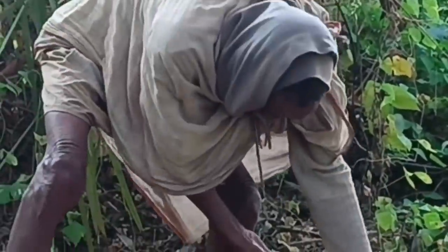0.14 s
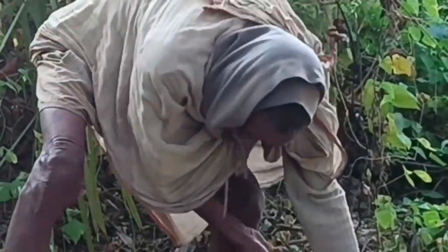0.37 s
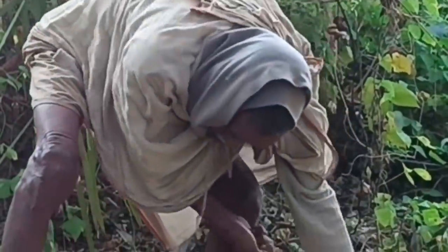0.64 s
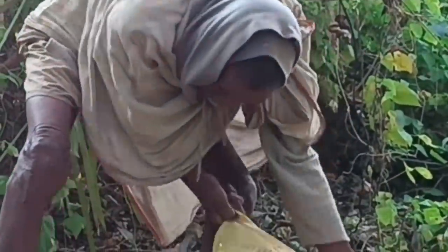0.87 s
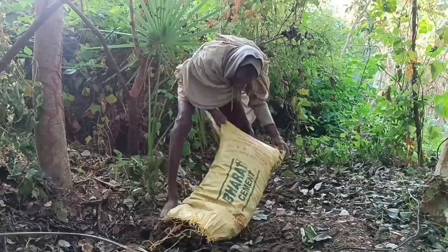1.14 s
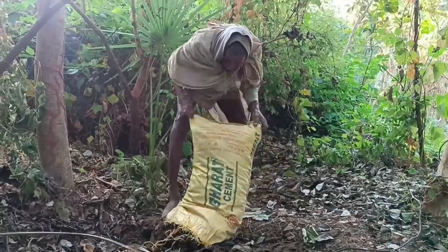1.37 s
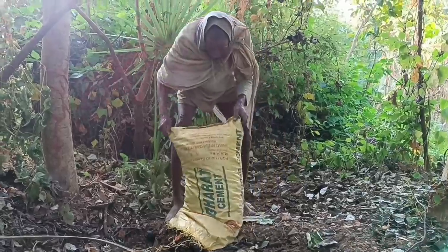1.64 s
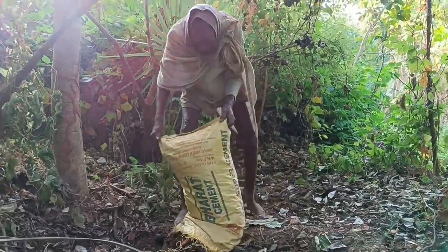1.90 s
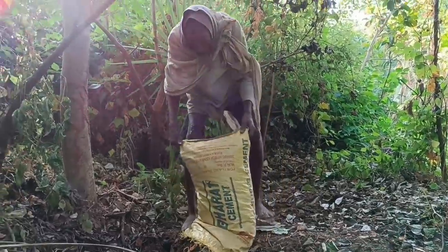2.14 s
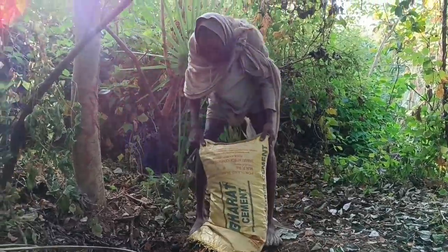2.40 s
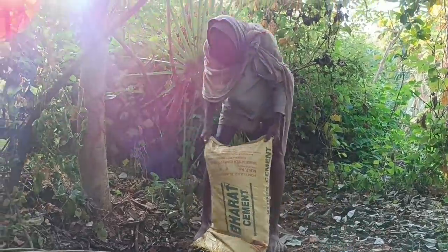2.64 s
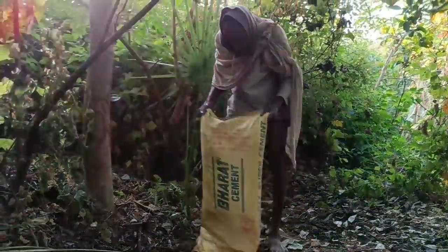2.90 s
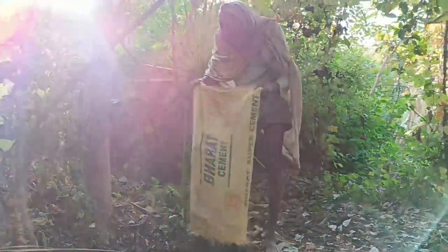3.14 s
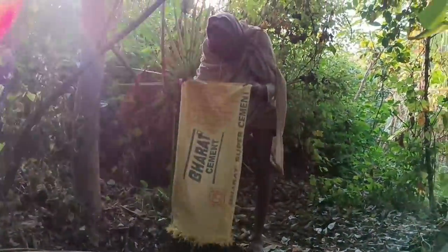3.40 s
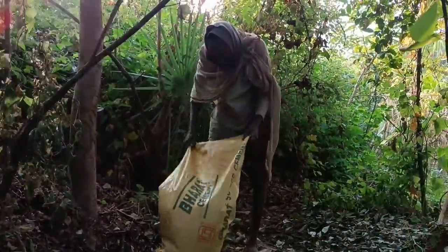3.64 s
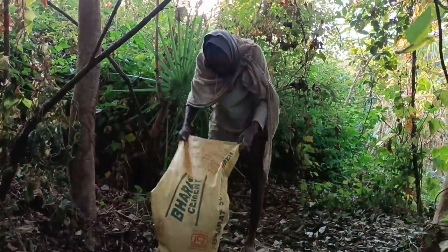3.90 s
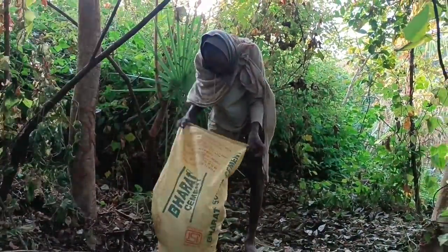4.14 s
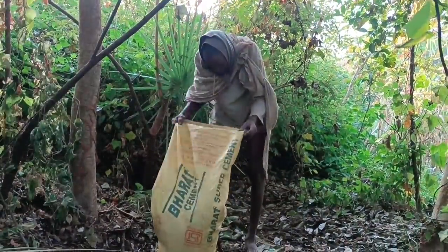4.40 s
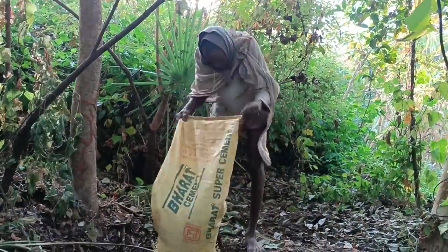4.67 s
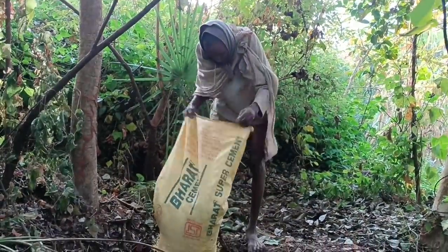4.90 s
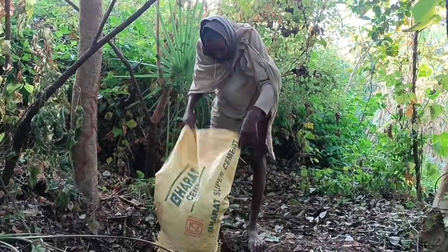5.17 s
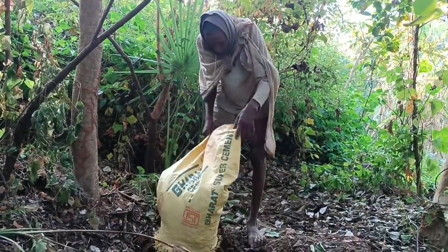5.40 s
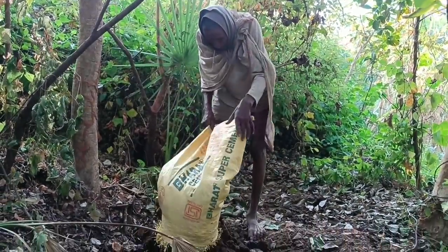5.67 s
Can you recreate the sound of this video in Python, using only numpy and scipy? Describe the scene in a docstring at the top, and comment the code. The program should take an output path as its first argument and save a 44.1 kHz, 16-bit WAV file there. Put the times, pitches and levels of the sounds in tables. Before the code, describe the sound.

A soft, low hush of distant leaves runs throughout. In the first second a thin, unsteady bird whistle holds high, then slides downward, while dry twigs snap close by at about 0.1 and 0.25 s. From 1 to 2 s there is light leaf stirring, small brittle ticks and a muffled cloth bump, with a faint dove-like coo; a rough leafy burst and hoarse little chirps come at 1.8 to 2.05 s. A scratchy, fizzy rustle swells near 2.4 s. From 2.8 to 3.6 s the stiff woven sack is hauled and shaken in a dense, hollow crackling rush, which stops abruptly. After softer shuffles around 3.8 to 4.2 s, forceful tugs follow at about 4.4, 4.7, 5.0, 5.3 and 5.4 s, each a crisp crunch with a short low thump and woody snaps, easing after 5.6 s. Outdoor phone pickup, close and dry.

```python
"""A soft hush of far leaves comes first, with a thin far bird whistle and dry twig snaps close by.
A stiff woven sack is then shaken and dragged over dry leaves in the bush, a few steps from a phone.
Random creases excite the crackle and hollow rings of the weave; damped low tones make the cloth thumps.
Gliding tones make small birds, a dove and one rough burst of leaf rustle. One bounce off the ground
answers body, thumps and snaps; decaying noise makes the scatter of the foliage."""
import sys
import numpy as np
from scipy import signal
from scipy.fft import rfft, irfft, next_fast_len
from scipy.io import wavfile
from scipy.ndimage import uniform_filter1d, map_coordinates

SR = 44100
rng = np.random.default_rng(int(sys.argv[2]) if len(sys.argv) > 2 else 0)


def to_wav(s):
    """Save 16-bit WAV."""
    ch = np.atleast_2d(s).T  # columns
    pcm = np.round(np.clip(ch, -1, 1) * 32767)  # PCM
    wavfile.write(sys.argv[1], SR, pcm.astype(np.int16))


def boost_factor(decibels):
    """Convert a level in decibels to a linear amplitude factor."""
    exponent = np.asarray(decibels, float) / 20
    return 10 ** exponent


N = 255056  # length in samples

# coherence of left and right for near sounds: f/Hz, likeness [-1 to 1]
NEAR_LIKENESS = [(60, 0.94), (270, 0.99), (740, 0.85), (2000, 0.58), (5500, 0.41), (9000, 0.04),
                 (15000, 0.15)]
# the same for the far bush and the far tones: f/Hz, likeness [-1 to 1]
FAR_LIKENESS = [(60, 0.33), (1200, 0.18), (9000, 0.21)]
# feet and hands stir the leaf litter throughout: t/s, level/dB, fine fizz/dB re level
RUSTLE = [(0, -81, 4), (.3, -90, 5), (.42, -78.5, 4.5), (.6, -73.5, 3.5), (.9, -70, 2), (1.15, -65, 4.5),
          (1.5, -64.5, 6), (1.7, -67.5, 10), (1.8, -63.5, 8), (2.0, -60.5, 7), (2.22, -72, 12),
          (2.65, -59.5, 1.5), (3.7, -60, 3), (4.3, -62, 7), (4.63, -65, 12), (4.93, -64.5, 13),
          (5.2, -60.5, 6), (5.5, -56.5, 8), (5.78, -66, 5)]


def unit(x):
    """Normalisation: the signal scaled to rms 1."""
    return x / np.sqrt(np.mean(x ** 2) + 1e-20)


def along(points, hz):
    """Interpolation of (f/Hz, value) points on a logarithmic frequency axis."""
    f, v = np.transpose(points)
    return np.interp(np.log(hz + 1), np.log(f + 1), v)


def curves(rows):
    """Linear interpolation in time: one value per sample for each column after t/s."""
    s, *cols = np.transpose(rows)
    return [np.interp(np.arange(N) / SR, s, c) for c in cols]


def wobble(rate):
    """Slow random modulation: a spline through normal random knots, rate knots a second."""
    return map_coordinates(rng.standard_normal(N // 100), [np.arange(N) * rate / SR])


def filtered(x, response):
    """Linear filtering: the spectrum times a complex response of frequency."""
    m = next_fast_len(N + SR // 2)
    return irfft(rfft(x, m) * response(np.fft.rfftfreq(m, 1 / SR)), m)[..., :N]


def coloured(x, spectrum):
    """Spectral shaping by a (f/Hz, level/dB) table, then rms 1."""
    return unit(filtered(x, lambda hz: boost_factor(along(spectrum, hz))))


def spread(a, b, alike):
    """Partial coherence: two channels share a and differ by b, by an angle set at each frequency."""
    turn = lambda hz: np.arccos(np.clip(along(alike, hz), -1, 1)) / 2
    mid, side = filtered(np.array([a, b]), lambda hz: np.array([np.cos(turn(hz)), np.sin(turn(hz))]))
    return np.array([mid + side, mid - side])


def panned(x, pan_db):
    """Interchannel level difference, half on each side."""
    return np.array([x * boost_factor(pan_db / 2), x * boost_factor(-pan_db / 2)])


def bush():
    """Broadband noise of far leaves and low air, slowly modulated in level as if breathing."""
    # far leaves and air: f/Hz, relative level/dB
    hush_spectrum = [(30, -22), (90, 3), (140, 0), (300, -9), (700, -19), (1500, -24.5), (4500, -25.5),
                     (16000, -36.5)]
    a, b = (coloured(rng.standard_normal(N), hush_spectrum) * boost_factor(3.2 * wobble(4.9)) for _ in range(2))
    return boost_factor(-63.0) * spread(a, b, FAR_LIKENESS)


def handling():
    """Incoherent sources add in power: haul, tugs and leaves give the level/dB of any layer."""
    # the full sack is hauled up and shaken: t/s, crackle level/dB,
    # weight/dB (how much of the filled body moves), hollow ring/dB
    haul_rows = [(2.701, -63, -2, -8), (2.78, -49, -17, 4), (2.86, -46, -6, 3), (2.999, -37.5, 9, -1.5),
                 (3.096, -37, 8, 3.5), (3.176, -31.5, 7.5, -2), (3.269, -40, 8.5, 2.5),
                 (3.301, -32.5, 8.5, 1), (3.396, -31, 3, -1), (3.582, -33.5, 10.5, 1), (3.627, -55.5, 1, 0),
                 (3.7, -82, -4, -10)]
    # short tugs at the cloth: peak t/s, crackle level/dB, rise/s, fall/s (each spans 20 dB),
    # weight/dB, hollow ring/dB
    tug_rows = [(.126, -55, 0.02, 0.03, -4, -7), (0.149, -55, .015, 0.027, -32, -9),
                (.533, -70, 0.022, 0.085, 5, 6), (1.01, -66.5, 0.16, .1, 14.5, 5.5),
                (1.337, -57.5, 0.017, 0.24, -5, 6), (1.41, -61, 0.046, 0.092, -2, 0),
                (1.516, -57.5, 0.016, 0.082, -8, -7), (1.57, -64.5, 0.09, 0.06, 13.5, 2),
                (1.657, -62, 0.023, 0.028, -27, -11), (2.407, -38, 0.083, 0.18, -23.5, -7),
                (2.5, -47.5, 0.23, 0.031, -20, -12), (2.569, -51.5, 0.056, 0.068, -45, -15),
                (3.685, -55.5, 0.14, 0.062, 11, 6), (3.78, -53, 0.046, .2, 9, 0),
                (3.839, -46, 0.12, 0.037, 11, -2), (3.993, -55.5, 0.14, 0.11, 4.5, 1),
                (4.162, -46.5, 0.081, 0.07, 4, -1), (4.428, -44.5, 0.028, 0.18, 11.5, 4.5),
                (4.5, -45.5, 0.19, 0.16, -9, -5), (4.576, -43, 0.081, 0.0283, 13.5, 2.5),
                (4.722, -34.5, 0.044, 0.11, 12, 3), (4.79, -46, .12, 0.2, -3, -2),
                (4.86, -47, 0.25, 0.064, 2, 0), (5.02, -42.5, 0.076, 0.11, 9.5, -3),
                (5.092, -40, 0.05, 0.027, 2, -8.5), (5.274, -38.5, 0.052, 0.11, 11.5, -7),
                (5.34, -45.5, 0.25, .2, -10, 2), (5.405, -34, 0.089, 0.036, 1, 3.5),
                (5.555, -44, 0.038, 0.066, 9, 3), (5.66, -53.5, 0.039, 0.084, -9, -3.5)]
    roundness = 0.042  # rounds the top of a tug
    t = np.arange(N) / SR
    silent_start = (haul_rows[0][0] - .1, -120, 0, 0)
    haul_db, haul_weight, haul_ring = curves([silent_start, *haul_rows])
    peak, db, rise, fall, weight, ring = np.transpose(tug_rows)
    u = (t - peak[:, None]) / np.where(t < peak[:, None], rise[:, None], fall[:, None])
    tug_power = boost_factor(-40 * (np.sqrt(u * u + roundness ** 2) - roundness))
    leaves_db, leaf_fizz_db = curves(RUSTLE)

    def level(cloth_db, per_weight, per_ring, leaf_db):
        """Power sum of one layer, from its gains on cloth, weight, ring and leaves."""
        tugs = boost_factor(2 * (db + per_weight * weight + per_ring * ring)) @ tug_power
        haul = boost_factor(2 * (haul_db + per_weight * haul_weight + per_ring * haul_ring))
        cloth = boost_factor(2 * cloth_db) * (tugs + haul)
        leaves = boost_factor(2 * (leaves_db + leaf_db))
        return 10 * np.log10(cloth + leaves)

    return level, leaf_fizz_db


def creases(per_s, scatter_db, rub):
    """Shot noise of tiny buckling clicks, most small and a few large, in clumps over a smooth rub."""
    chance = np.clip(per_s * boost_factor(3 * wobble(30)) / SR, 0, 1)
    size = boost_factor(scatter_db * np.minimum(rng.exponential(size=N), 3)) * rng.standard_normal(N)
    # denser clicks are made smaller, so that density alone hardly changes the power
    clicks = (rng.random(N) < chance) * unit(size) / np.sqrt(per_s / SR)
    return clicks + rub * rng.standard_normal(N)


def patchy(x, patchy_db):
    """Time-varying colour: folds come and go, so small patches of time and frequency shift in level."""
    z = signal.stft(x, SR, nperseg=512)[2]
    field = uniform_filter1d(rng.standard_normal(z.shape), size=3, axis=0)
    field = uniform_filter1d(field, size=6, axis=1)
    return unit(signal.istft(z * boost_factor(patchy_db * unit(field)), SR, nperseg=512)[1][:N])


def crumples(count):
    """Damped resonance: folds of stiff weave pop at random, each ringing at its own pitch; rms 1."""
    middle_hz, octaves, cycles = 1300, 0.79, 15  # pitch and its spread; cycles in a 60 dB decay
    when, size = rng.random((count, 2)).T
    hz = middle_hz * 2 ** (octaves * rng.standard_normal((count, 1)))
    t = np.arange(SR // 25) / SR
    decay = boost_factor(11.6 * size[:, None] - 60 * t * hz / cycles)
    onset = 1 - np.exp(-t * hz)
    rings = decay * onset * np.sin(2 * np.pi * hz * t)
    at = (when * N).astype(int)[:, None] + np.arange(len(t))
    return unit(np.bincount(at.ravel(), rings.ravel())[:N])


def sack():
    """Common excitation: one crease stream drives crackle, fizz and hollow rings; slack cloth booms."""
    # crackle of the weave: f/Hz, relative level/dB
    crackle_spectrum = [(1100, -67), (1600, -10.5), (2200, -5.5), (3300, -8.5), (4400, -12.5), (8000, -55)]
    # fine fizz of the threads: f/Hz, relative level/dB
    fizz_spectrum = [(2000, -81), (3400, -12), (5000, 1.5), (7000, 3.5), (16000, -8)]
    # boom of the slack cloth: f/Hz, relative level/dB
    boom_spectrum = [(40, -45), (75, -7.5), (120, 0), (230, -2.5), (420, 0.5), (650, -24), (1200, -92)]
    # upper hollow ring of the sack: f/Hz, relative level/dB
    upper_spectrum = [(600, -56), (920, -8.5), (1250, 7.5), (1450, 8), (1620, -6.5), (2400, -49)]
    # lower hollow ring of the sack: f/Hz, relative level/dB
    lower_spectrum = [(350, -25), (560, -10.5), (720, 1.5), (920, -7.5), (1400, -36.5)]
    # fizz re crackle: cloth/dB, gain per weight [dB/dB], gain per hollow ring [dB/dB]
    fizz_mix = (-1.4, 0.046, 0.15)
    # upper ring, lower ring and boom re crackle: the same three columns, then leaves/dB
    upper_mix = (-1.16, 0.02, 0.85, -6.5)
    lower_mix = (-5, 0.39, -0.5, -16.5)
    boom_mix = (-0.6, 0.85, 0.17, -4)

    level, leaf_fizz_db = handling()
    stir_db = 4.5 * wobble(14)  # unevenness of the stirring
    crackle_db = level(0, 0, 0, stir_db)
    fizz_db = level(*fizz_mix, leaf_fizz_db + .5 * stir_db)
    upper_db, lower_db, boom_db = (level(*mix, leaf_db + stir_db) + 2.03 * wobble(12)
                                   for *mix, leaf_db in (upper_mix, lower_mix, boom_mix))

    # harder handling buckles more threads at once, so clicks fuse into a dense rush
    per_s = 900 + 9000 * boost_factor(crackle_db + 35)
    shared = creases(per_s, scatter_db=1.5, rub=0.96)
    crackle = boost_factor(crackle_db) * patchy(coloured(shared, crackle_spectrum), patchy_db=1.3)
    upper = boost_factor(upper_db) * patchy(coloured(shared, upper_spectrum), patchy_db=2.5)
    lower = boost_factor(lower_db) * patchy(coloured(shared, lower_spectrum), patchy_db=7.0)
    boom_source = 0.66 * shared + rng.standard_normal(N)
    boom = boost_factor(boom_db - 2.5 + 1.6 * wobble(18)) * coloured(boom_source, boom_spectrum)
    folds = boost_factor(level(-7.5, 0.19, 0.65, stir_db - 10.5)) * crumples(count=900)

    # the fizz comes from the whole width of the weave, so each port hears other threads
    near, wide = (creases(2.5 * per_s, scatter_db=3.5, rub=0.54) for _ in range(2))
    threads = [patchy(coloured(v, fizz_spectrum), patchy_db=1.7) for v in (near + .6 * shared, wide)]
    fizz = boost_factor(fizz_db) * spread(*threads, NEAR_LIKENESS)
    return crackle + upper + lower + boom + folds, fizz


def whistle():
    """Frequency modulation: a far bird holds one thin, unsteady tone, then slides down another."""
    # two whistled notes, each with rows of: t/s, f/Hz, level/dB
    whistled = [
        [(.05, 4580, -79), (.42, 4400, -80)],
        [(.43, 3950, -72), (.5, 3720, -73), (.56, 3560, -67), (.63, 3430, -73), (.73, 3345, -72),
         (.76, 3315, -62), (.84, 3220, -72), (1.03, 2950, -75)],
    ]
    out, t = np.zeros(N), np.arange(N) / SR
    for rows in whistled:
        hz, db = curves(rows)
        start, end = rows[0][0], rows[-1][0]
        on = np.clip(np.minimum(t - start, end - t) / 0.0079, 0, 1)  # ramps in s
        phase = 2 * np.pi * np.cumsum(hz * (1 + .014 * wobble(400))) / SR
        out += on * np.sqrt(2) * boost_factor(db + 2.5 * wobble(50)) * np.sin(phase)
    return out


def ticks(count):
    """Random fracture: small leaves break at any moment, their level following the stirring."""
    when, size, pitch, bright = rng.random((count, 4)).T
    s = when * N / SR
    db = np.interp(s, *np.transpose(RUSTLE)[:2]) + 14.5 + 8 * size
    hz = 5160 * boost_factor(6 * (pitch - .5))
    return list(zip(s, db, hz, -32 + 12 * bright))


def snaps():
    """Brittle fracture: a few cycles at the piece's pitch and a broad burst of splinters."""
    # twig and leaf snaps, before common gains: t/s, level/dB, f/Hz, treble/dB re level
    breaks = [(0.081, -64, 5190, 0), (0.1239, -35.5, 3340, -38), (0.1461, -35, 3650, -38),
              (0.264, -45, 4500, -41), (1.1338, -43, 5570, -28), (1.233, -45, 3000, -28),
              (1.261, -45, 4480, -15), (1.339, -46, 1300, -30), (1.365, -47, 1250, -30),
              (1.3975, -48, 1270, -32), (1.483, -39.5, 1360, -26), (1.5147, -42, 2370, -9),
              (1.5666, -31.5, 5860, -29), (1.6309, -45, 1240, -10), (1.577, -39, 5310, -24),
              (1.815, -40, 5200, -18), (1.8253, -48, 5410, -10), (1.9607, -36, 5500, -33),
              (2.054, -42, 5800, -21), (4.33, -44, 6160, -15), (2.174, -44, 3470, -27),
              (2.783, -32, 1350, -25), (2.8277, -35.5, 1200, -20), (4.422, -43, 1240, 0),
              (4.7068, -24, 1310, -27), (4.7208, -19.5, 1944, -35), (4.817, -30, 1400, -9),
              (5.0928, -28.5, 2120, -40), (5.2658, -18, 1370, -49), (5.4077, -23.5, 1220, -40),
              (5.541, -33, 2250, -25)]
    out, t = np.zeros((2, N + SR)), np.arange(SR // 20) / SR
    for s, db, hz, bright_db in [*breaks, *ticks(count=70)]:
        ring = boost_factor(-60 * t * hz / 18) * np.sin(2 * np.pi * hz * t)  # 60 dB down in 18 cycles
        chips = rng.standard_normal(len(t) + 2)
        broad = chips[2:] - chips[:-2]
        treble = np.diff(chips, 2)
        splinters = boost_factor(-60 * t / 0.0079) * (0.084 * broad + boost_factor(bright_db + 9.5) * treble)
        snap = panned(boost_factor(db + 1.5) * (ring + splinters), rng.normal(-1.5, 2))
        out[:, round(s * SR):][:, :len(t)] += snap
    return out[:, :N]


def glides(rows):
    """Frequency glide: tones swell and fade; random pitch modulation makes them flutter or turn rough."""
    out, t = np.zeros(N), np.arange(N) / SR
    for start, end, start_hz, end_hz, db, flutter in rows:
        u = np.clip((t - start) / (end - start), 0, 1)
        hz = (start_hz + (end_hz - start_hz) * u) * (1 + flutter * wobble(400))
        swell = np.sqrt(2 * np.abs(np.sin(np.pi * u))) * boost_factor(db + 3.8 * wobble(80))
        out += swell * np.sin(2 * np.pi * np.cumsum(hz) / SR)
    return out


def flaps():
    """Damped oscillation: taut cloth pushes a few low cycles of air, after a soft rise."""
    # cloth jerked taut, before common gains: t/s, level/dB, f/Hz, 60 dB decay time/s
    jerks = [(0.62, -47.5, 243, .031), (0.795, -51, 120, 0.12), (1.002, -34, 283, .048),
             (1.21, -47.5, 84, 0.12), (1.488, -45, 311, 0.089), (2.173, -52.5, 148, 0.19),
             (3.67, -42, 305, 0.11), (3.812, -32, 132, .13), (4.132, -31.5, 140, 0.096),
             (4.15, -33.5, 239, 0.097), (4.425, -16, 240.4, 0.038), (4.437, -19, 150, 0.051),
             (4.546, -28, 191, .08), (4.559, -20, 142, .07), (4.725, -12.5, 219.7, 0.047),
             (5.015, -25, 121, 0.12), (5.261, -18, 248, .05), (5.27, -19, 214, 0.047),
             (5.384, -19.5, 300, 0.039), (5.402, -20.5, 215, 0.056), (5.553, -31, 150, .09)]
    out, t = np.zeros(N + SR), np.arange(SR // 4) / SR
    for (s, db, hz, t60), detune in zip(jerks, rng.normal(size=len(jerks))):
        overtone_hz = hz * (1.5 + 0.16 * detune)
        ring = np.sin(2 * np.pi * hz * t) + 0.24 * np.sin(2 * np.pi * overtone_hz * t)
        rise = 1 - np.exp(-t * hz / 0.5)  # time constant of half a cycle
        out[round(s * SR):][:len(t)] += boost_factor(db + 5.5 - 60 * t / t60) * rise * ring
    return out[:N]


def ground(x):
    """Comb interference by one bounce off the leaf litter, which swallows the treble."""
    delay_s = 0.000937

    def response(hz):
        bounce = 0.37 / (1 + (hz / 2800) ** 4)
        return 1 + bounce * np.exp(-2j * np.pi * hz * delay_s)

    return filtered(x, response)


def foliage(x):
    """Diffuse scattering from trunks and leaves: noise tails, changing as the source moves."""
    # decay of the scatter: f/Hz, 60 dB decay time/s
    scatter_decay = [(200, 0.031), (2000, 0.04), (12000, 0.024)]
    hop, out = 2048, np.zeros(N + SR)
    starts = np.arange(-hop, N, hop)
    hz, t, z = signal.stft(rng.standard_normal((len(starts), SR // 8)), SR, nperseg=128)
    decay = boost_factor(-60 * t / along(scatter_decay, hz)[:, None])
    decay = decay / np.linalg.norm(decay, axis=1, keepdims=True)
    tails = signal.istft(z * decay, SR, nperseg=128)[1]
    # overlapping pieces, each with its own tail
    padded, fade = np.pad(x, (hop, 2 * hop)), np.sqrt(np.hanning(2 * hop))
    for start, tail in zip(starts + hop, tails):
        piece = signal.fftconvolve(padded[start:start + 2 * hop] * fade, tail / np.linalg.norm(tail))
        out[start:start + len(piece)] += piece
    return out[hop:hop + N]


def scene():
    """Superposition: near sounds reach both ports directly; their scatter differs from port to port."""
    # a rough burst of leaf rustle, then hoarse chirps:
    # start t/s, end t/s, start f/Hz, end f/Hz, level/dB, flutter [share of f]
    burst_and_chirps = [(1.77, 1.85, 5050, 5430, -53.5, .12), (1.88, 1.94, 5100, 4910, -52, .02),
                        (1.89, 2.05, 4710, 4430, -55, 0.019), (1.94, 1.99, 5430, 5760, -51, 0.0273),
                        (1.96, 2.06, 5800, 6030, -63, .015)]
    # soft low notes of a dove and far birds: the same columns
    coos = [(.93, 1.07, 700, 670, -69, .012), (1.75, 1.84, 680, 700, -66, .015),
            (.44, .55, 1980, 1830, -76, .015)]
    hush = bush()
    body, fizz = sack()
    tones = whistle() + glides([*burst_and_chirps, *coos])
    near = ground(boost_factor(-0.82) * (body + flaps()) + snaps())
    mono = near.mean(axis=0)
    scattered = spread(mono, foliage(mono), NEAR_LIKENESS)
    left_gain = boost_factor([[1.5], [-1.5]])  # the tones sit to the left
    far_tones = left_gain * spread(tones, foliage(tones), FAR_LIKENESS)
    return near - mono + scattered + fizz + far_tones + hush


def band_limit(x):
    """A steep low-pass at the top of the band."""
    return signal.sosfilt(signal.butter(12, 16640, fs=SR, output="sos"), x)


def record(dry):
    """Reception at two ports: own colour, shading by the phone's body, a left lead, a band limit."""
    # microphone behind its port: f/Hz, level/dB
    port_colour = [(30, -21), (55, -0.5), (90, -5), (6200, 2), (7400, -5.5), (8300, -9), (8700, -6),
                   (10600, -4), (12000, -10.5), (14000, -5), (14300, -1), (15300, 6)]
    # the phone's body shades its ports: f/Hz, left minus right level/dB
    shadow = [(60, 4.5), (99, -1), (160, 0.5), (270, 0.5), (450, -1.5), (740, 2), (1220, -1.5), (2010, 1.5),
              (3330, 1.5), (5500, -7.5), (9080, 5), (12000, 10.5), (15000, 1.5)]
    side = np.array([[.5], [-.5]])
    lead_s, top_hz = .00005, 15520

    def ports(hz):
        colour = boost_factor(along(port_colour, hz) + side * along(shadow, hz))
        lead = np.exp(2j * np.pi * hz * side * lead_s)
        return colour * lead * (hz < top_hz)

    mix = filtered(dry, ports)
    return band_limit(mix)


dry = scene()
out = record(dry)
to_wav(out)
```